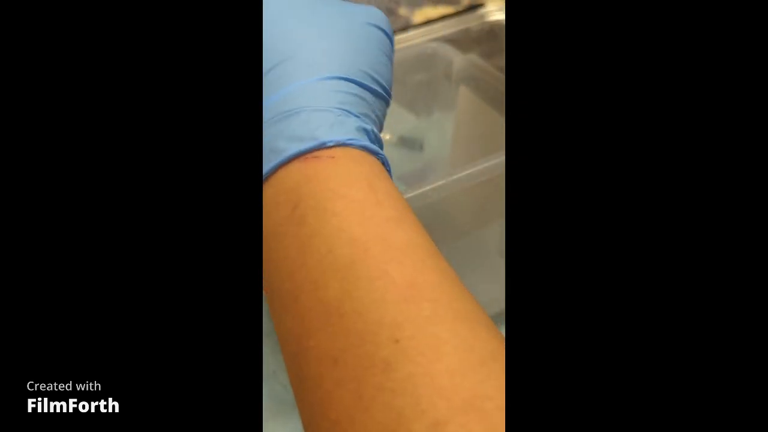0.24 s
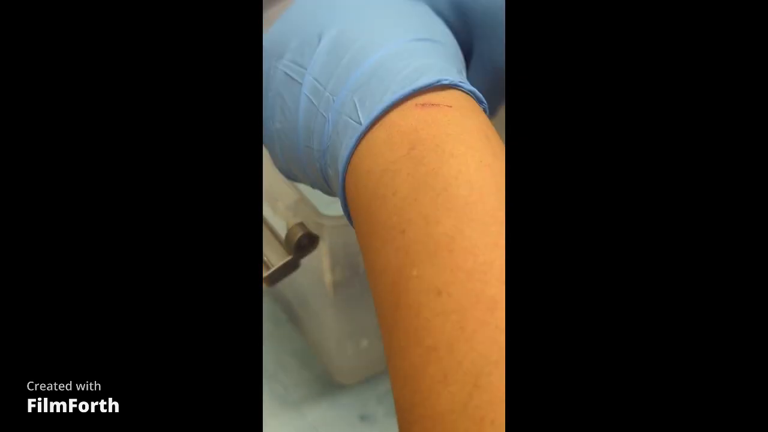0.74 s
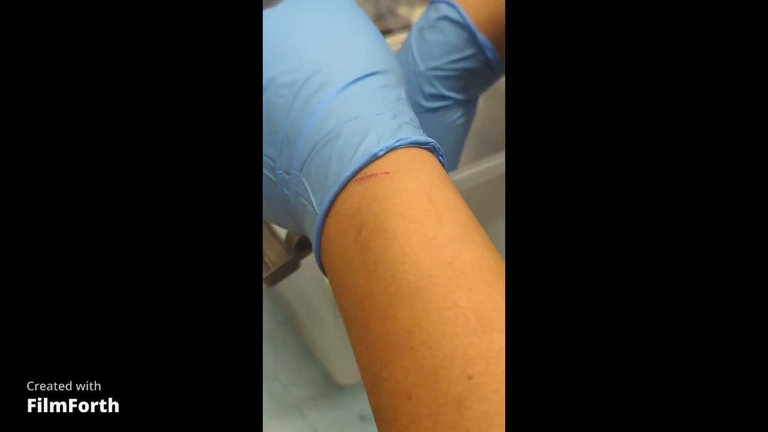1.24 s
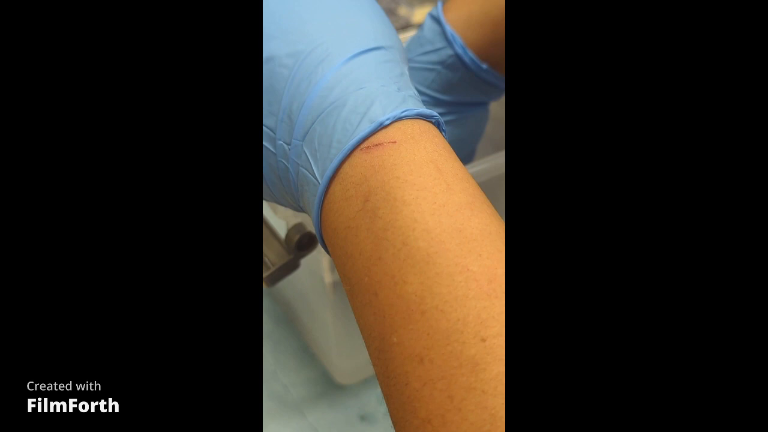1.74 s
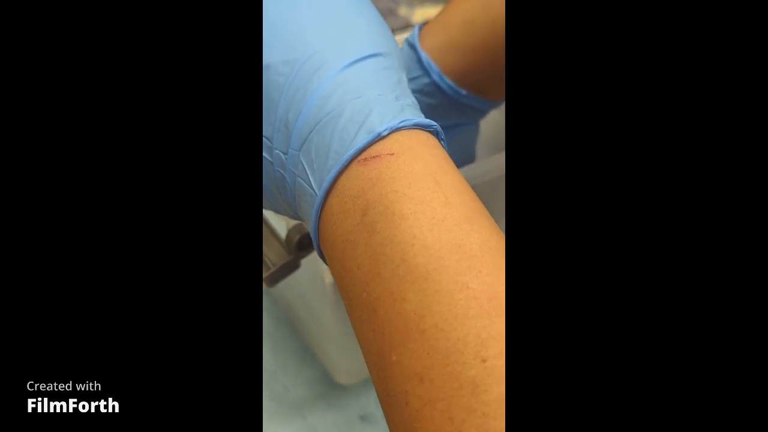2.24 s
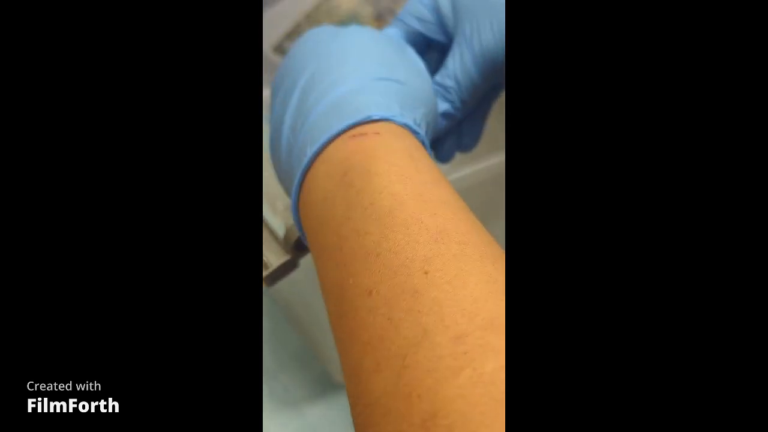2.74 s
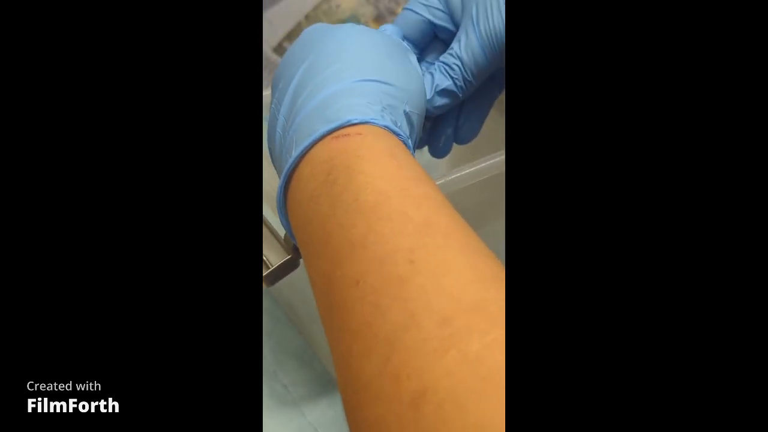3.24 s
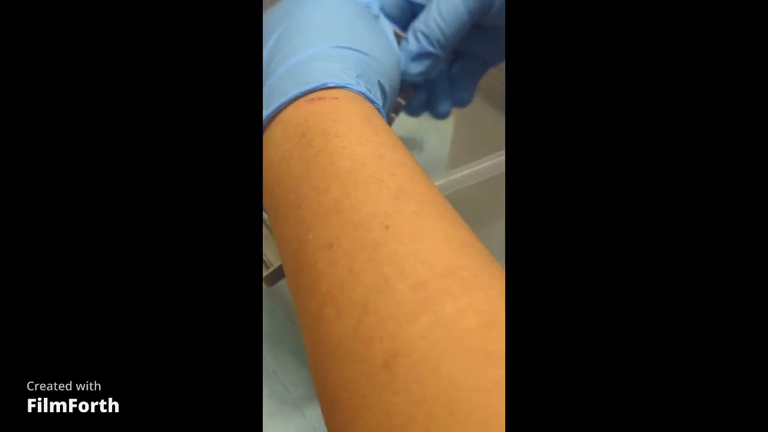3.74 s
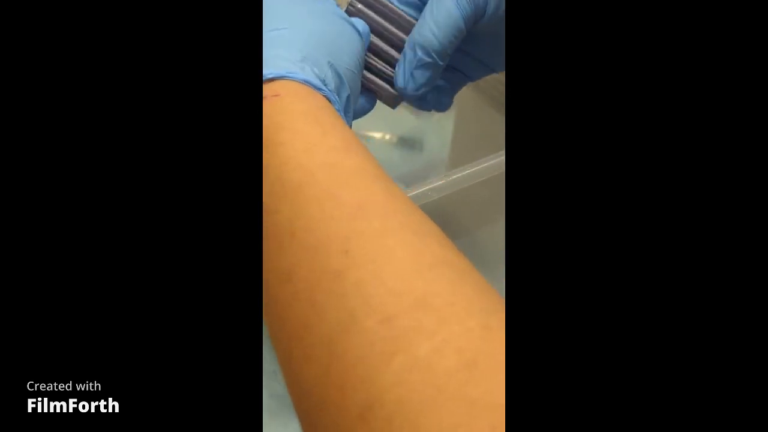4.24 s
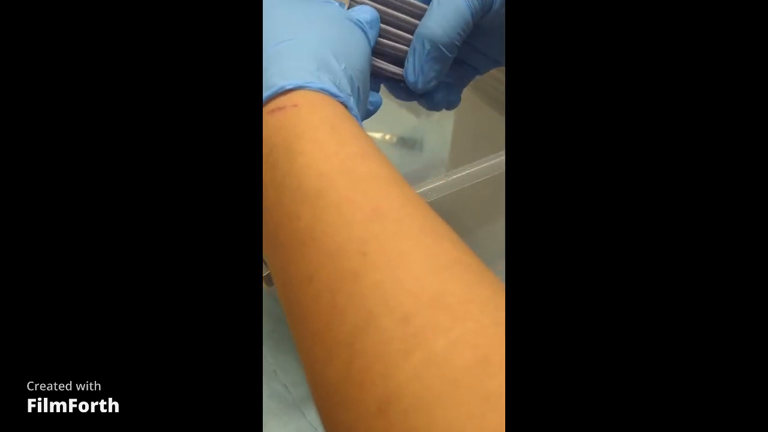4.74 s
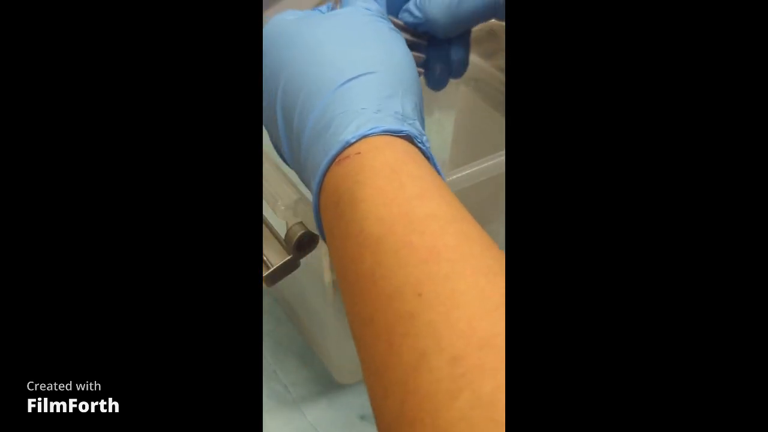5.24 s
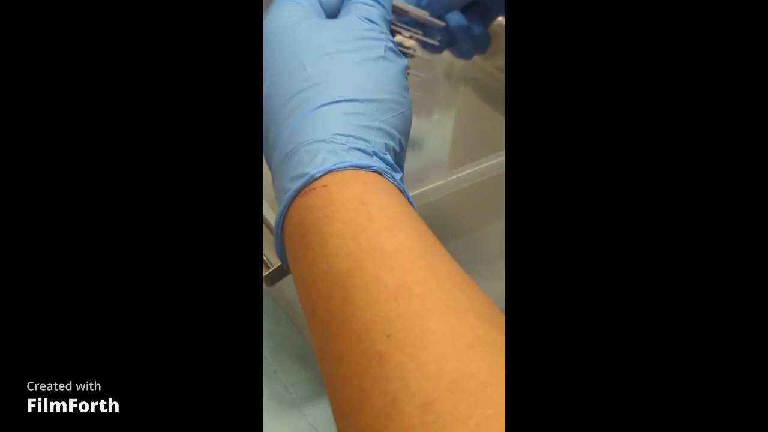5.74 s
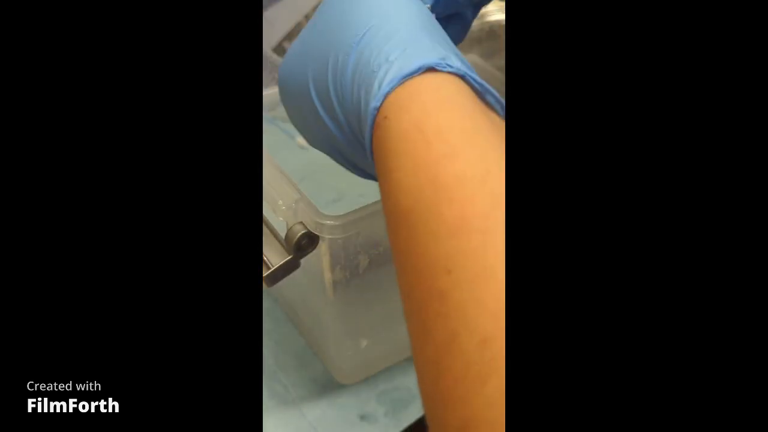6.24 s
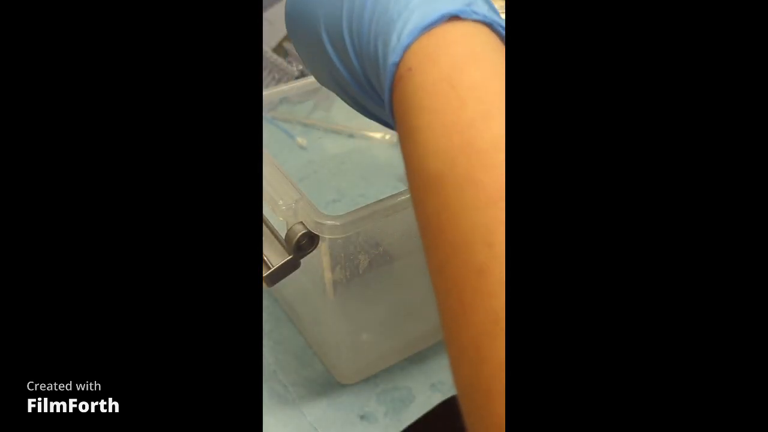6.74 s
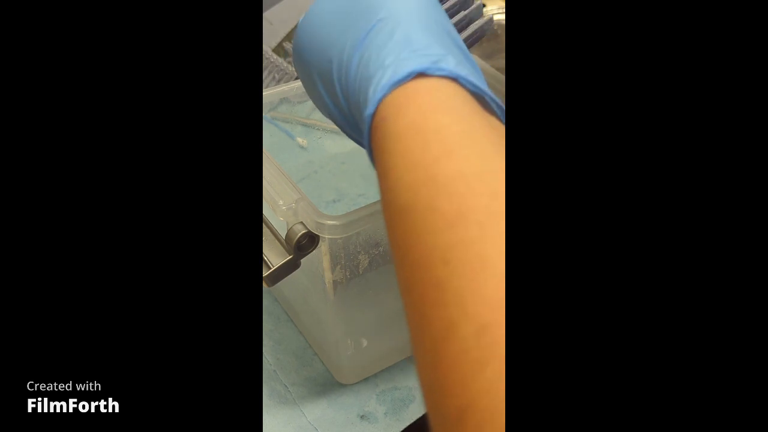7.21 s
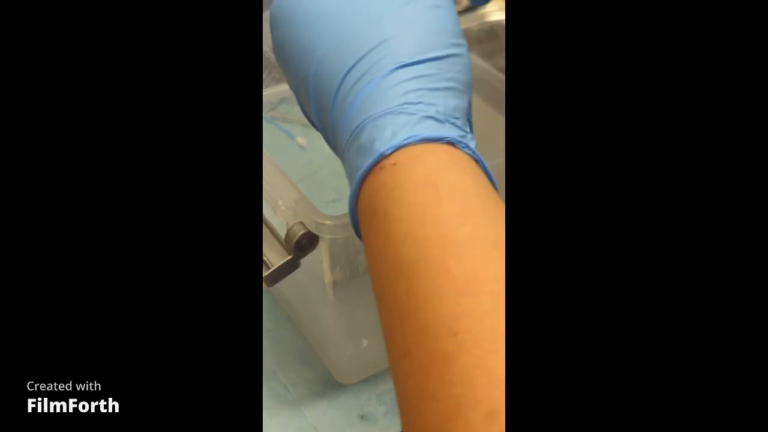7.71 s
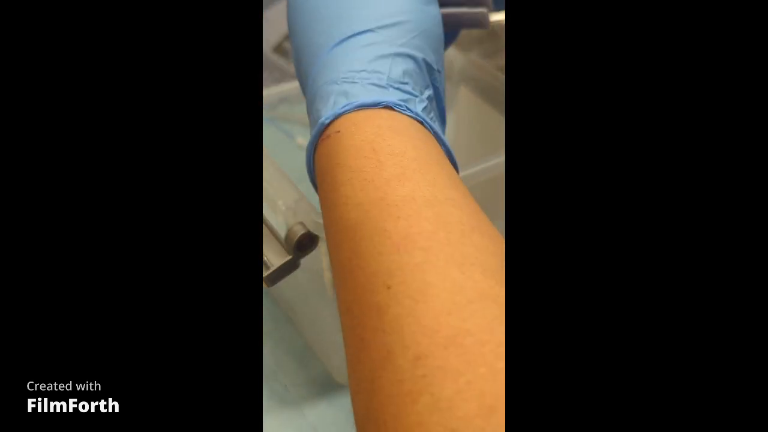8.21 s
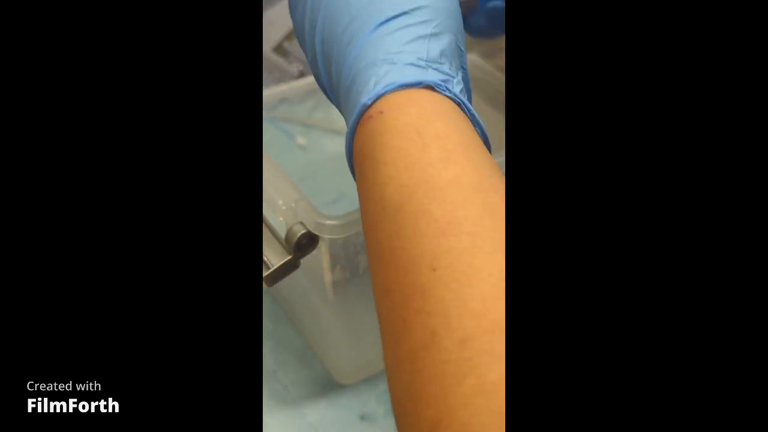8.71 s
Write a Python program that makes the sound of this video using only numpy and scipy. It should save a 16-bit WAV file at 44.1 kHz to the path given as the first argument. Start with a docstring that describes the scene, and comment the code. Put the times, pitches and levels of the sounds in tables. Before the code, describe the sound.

Very close stereo pickup in a quiet, dry indoor workspace. Gloved hands break thin brittle supports off a resin part: crisp clicks with tiny splintering crackle. A few snaps and hollow knocks on a plastic tub come first, then a dense run of bright cracks, a few isolated hard snaps, and finally a strong double tub knock. Faint glove rustle and soft bench thumps sit over a low ventilation hum with a wavering drone.

```python
"""Resin supports snapped off by hand

Gloved hands break thin resin supports off a printed part over a plastic tub, close to a two-port microphone.
Each break is a noise click and shower inside a short crackle of noise grains, both coloured by resin modes.
Decaying sines make the knocks on the tub and the bench thumps; wavering near-sines make the glove squeaks.
Behind lie a clumpy noise rustle, a faint room tail, a resonant noise hum and a wavering low drone."""
import sys
import numpy as np
from scipy import signal
from scipy.fft import rfft, irfft
from scipy.io import wavfile
from scipy.ndimage import uniform_filter1d

SR = 44100
rng = np.random.default_rng(int(sys.argv[2]) if len(sys.argv) > 2 else 0)


def generate_wav(signal):
    """Clip the signal to [-1, 1] and save it as 16-bit WAV at the path in sys.argv[1]."""
    frames = np.transpose(np.atleast_2d(signal))
    scaled = np.clip(frames, -1, 1) * 32767
    pcm = np.round(scaled).astype(np.int16)
    wavfile.write(sys.argv[1], SR, pcm)


def volts_from_decibels(level):
    """Turn decibel levels (scalar or array-like) into linear amplitude factors."""
    exponent = np.asarray(level, float) / 20
    return 10 ** exponent


N = 395577


def evened(x):
    """Scales to rms 1."""
    return x / np.sqrt(np.mean(x ** 2) + 1e-20)


def smooth_noise(count, size):
    """Noise under a moving average of size samples, at rms 1."""
    return evened(uniform_filter1d(rng.standard_normal(count), size=size))


def near(hz, centre_hz, octaves):
    """1 at the centre, falling off over some octaves."""
    return np.exp(-(np.log2(hz / centre_hz) / octaves) ** 2)


def read(points, hz):
    """Reads a spectrum table on a log-frequency axis."""
    f, value = np.transpose(points)
    return np.interp(np.log(hz + 1), np.log(f + 1), value)


def humps_db(modes, hz):
    """Resonance humps above a spectrum."""
    return sum(db / (1 + (2 * (hz - f) / width) ** 2) for f, width, db in modes)


def add(mix, s, sound):
    """Mixes a sound in at time s, cut at the end of the mix."""
    part = mix[..., round(s * SR):][..., :sound.shape[-1]]
    part += sound[..., :part.shape[-1]]


RIGHT_LAG_S, LEFT_GAIN_DB = 0.00021, 0.54


def ports(a, b, hz, likeness):
    """Two port spectra: a shared share that reaches the right port late, and an unshared one."""
    same = np.clip(likeness, 0, 1)
    right = same * a + np.sqrt(1 - same ** 2) * b
    right = right * np.exp(-2j * np.pi * hz * RIGHT_LAG_S)
    return np.array([a * volts_from_decibels(LEFT_GAIN_DB), right])


# relative snap spectrum: [f/Hz, density/dB per Hz]
SNAP_SPECTRUM = [(530, -43), (900, -10.5), (1150, -15), (1720, -4), (3430, -7), (4360, -1.5), (7770, -1),
                 (8980, 0), (14700, -5.5), (16000, -26.5), (16600, -58.5)]
# modes of part and lattice when ungripped: [f/Hz, width/Hz, height/dB]
PART_MODES = [(3970, 210, 9.5), (4260, 93, 13.5), (4900, 370, 7.5), (5280, 320, 14.5), (6440, 660, 11.5),
              (6800, 380, 12), (8050, 440, 8), (9100, 540, -4), (11130, 600, 5.5), (11800, 540, 10),
              (13700, 720, -13.5)]


def resin(drive, bright_db, free_hz, likeness, ring=1):
    """Colours a drive like brittle resin; the grip damps all modes but those near free_hz."""
    size = drive.shape[1]
    hz = np.fft.rfftfreq(size, 1 / SR)
    tip_db = bright_db * 0.84 * np.log2(np.clip(hz, 2500, 16000) / 7500)
    modes = [(f, width, ring * db * near(f, free_hz, 0.16)) for f, width, db in PART_MODES]
    uneven_db = 1.9 * smooth_noise(len(hz), size // 80)  # no two supports alike
    colour = volts_from_decibels(read(SNAP_SPECTRUM, hz) + uneven_db + tip_db + humps_db(modes, hz))
    colour /= np.sqrt(np.sum(colour[hz > 3500] ** 2) / len(hz))
    # minimum phase: rings only after the blow
    log_gain = np.log(np.r_[colour, colour[-2:0:-1]])
    colour = colour * np.exp(-1j * signal.hilbert(log_gain).imag[:len(hz)])
    return irfft(ports(*rfft(drive), hz, likeness) * colour, size)


# one support parting: [t/s of crack, crack level/dB, crackle length after crack/s,
# treble tilt/(0.84 dB per octave), freely ringing f/Hz]
SUPPORT_BREAKS = [(0.057, -35.5, 0.022, -3, 5240), (0.1432, -42, .005, -11, 4900),
                  (0.1589, -43, .012, -2, 11800), (0.3925, -52, .008, -16, 4940),
                  (1.3038, -50.5, 0.03, -25, 4300), (1.648, -40.5, 0.019, -15, 4530),
                  (1.7302, -55.5, 0.012, -16, 4120), (2.0471, -51, 0.024, -30, 3310),
                  (3.0356, -32.5, 0.016, -3, 6800), (3.1617, -31, 0.022, -2, 6400),
                  (3.2253, -41, 0.023, -6.5, 8070), (3.2762, -43, 0.0069, 2, 7140),
                  (3.324, -51.5, 0.019, -10, 6250), (3.4298, -45.5, .008, -11, 6140),
                  (3.5539, -42.5, 0.023, -5, 6700), (3.5666, -50, .006, 4, 9090),
                  (3.6805, -42.5, 0.019, -4, 9300), (3.8571, -39, 0.0074, -4, 4300),
                  (4.215, -46, 0.014, -7, 5200), (4.2584, -46.5, 0.012, -8, 4920),
                  (4.4277, -36, 0.008, -2, 6700), (4.5358, -39, 0.0087, 0, 5370),
                  (4.5635, -53, .01, -10, 5220), (4.5806, -52, .01, -10, 6440),
                  (4.6536, -49, .01, -9, 6760), (4.707, -48, 0.024, -5, 9360),
                  (4.7784, -43, .008, -4, 8260), (4.823, -53, .015, -3, 4950),
                  (4.842, -58, .014, -10, 4550), (5.1184, -54, 0.021, -12, 5350),
                  (5.2777, -31.5, 0.016, -6, 5350), (5.4246, -57, 0.017, -17, 4290),
                  (5.4725, -24, 0.012, -0.5, 10100), (5.7117, -57.5, .008, -14, 4260),
                  (6.4494, -37.5, 0.0068, -10, 4300), (6.4591, -27, 0.021, -6.5, 4230),
                  (7.3686, -60, .008, -16, 4310), (7.6062, -46.5, 0.012, -14, 4280),
                  (7.616, -44, .016, -11, 4260), (7.9366, -56, 0.016, -10, 5000),
                  (8.3141, -42, 0.015, -1.5, 4250), (8.8004, -59, .01, -21, 4010)]
SPLINTER_DB, SPLINTER_T60_S = -8.5, 0.021


def cracks():
    """A click of a few samples, then a fast-dying shower of splinters and near echoes."""
    out = np.zeros((2, N))
    t = np.arange(2048) / SR - .01
    after = t >= 0
    for s, db, _, bright_db, free_hz in SUPPORT_BREAKS:
        noise = rng.standard_normal((2, len(t)))
        click = noise * np.exp(-(t / 0.000085) ** 2)
        click /= np.linalg.norm(click, axis=1, keepdims=True)
        shower = noise * after * volts_from_decibels(SPLINTER_DB - 60 * t * after / SPLINTER_T60_S)
        add(out, s - .01, volts_from_decibels(db) * resin(3.4 * click + shower, bright_db, free_hz, 0.38))
    return out


# lattice torn, jolted or rubbed with no single crack: [t/s, length/s, start level/dB,
# level change to end/dB, treble tilt/(0.84 dB per octave), freely ringing f/Hz]
LATTICE_RUBS = [(.044, .014, -56, 2, -3, 7840), (.143, 0.028, -43, -20, -3.5, 4900),
                (.364, 0.04, -44.5, -19, -17.5, 4620), (1.33, 0.015, -72.5, -2, -12, 4100),
                (2.231, .022, -73.5, -2, -15, 7500), (2.828, 0.031, -66.5, -14, -0.5, 7300),
                (3.086, .033, -57.5, -7.5, -4, 6380), (3.427, .014, -57.5, -3, 0, 6440),
                (3.572, 0.028, -74, -5, -7, 9090), (3.627, 0.032, -74, -2, -8, 9090),
                (3.682, 0.044, -60, -16, -3, 9300), (3.753, 0.032, -71, -5, -6, 4340),
                (3.802, .021, -74, 0, -15, 5310), (3.853, 0.032, -43.5, -11, -6, 8050),
                (3.888, 0.067, -74.5, 3, -10, 7300), (4.014, 0.039, -68.5, -6, -6, 5360),
                (4.063, .07, -75.5, -5, -13, 7300), (4.206, 0.046, -58, -5, -7, 5070),
                (4.334, 0.032, -67.5, -6, -4, 5260), (4.406, 0.021, -47, -14, -2, 6800),
                (4.54, 0.066, -63, -9, -6, 5830), (4.683, .022, -72.5, 0, -8, 6550),
                (4.764, 0.017, -54.5, -7, -1, 6800), (4.825, .035, -69, -5, -8, 6910),
                (5.279, .045, -56, -17, -7, 4260), (5.453, 0.02, -48.5, -1, -3, 5270),
                (6.23, .02, -76.5, 0, -14, 5280), (6.284, .028, -81, 1, -6, 5280),
                (6.445, .017, -48, -7.5, -8, 11860), (7.053, 0.028, -34, -23, 9, 11800),
                (7.054, .03, -42, -16, -9, 4260), (7.347, .008, -70, 0, -13, 4500),
                (7.661, 0.039, -57, -6.5, -13.5, 4050), (8.595, 0.028, -46, -22.5, -24, 4900),
                (8.627, .018, -60, -28, -38, 3800)]
LEAD_S, LEAD_DB = .009, -23  # short rise into the crack: duration, start re top
UNDER_DB, DYING_DB = -12.5, -15.5  # top re crack level; end re top
RING_SHARE = 0.81  # grains excite the modes less than a crack does


def crackles():
    """Dense uneven grains around each crack and in each rub, with a short fade at the end."""
    out = np.zeros((2, N))
    t = np.arange(4096) / SR - .01
    shapes = []
    for s, db, length, bright_db, free_hz in SUPPORT_BREAKS:
        times = [0, LEAD_S, LEAD_S + length]
        dbs = db + UNDER_DB + np.array([LEAD_DB, 0, DYING_DB])
        shapes.append((s - LEAD_S, times, dbs, bright_db, free_hz))
    for s, length, db, fall_db, bright_db, free_hz in LATTICE_RUBS:
        shapes.append((s, [0, length], [db, db + fall_db], bright_db, free_hz))
    for s, times, dbs, bright_db, free_hz in shapes:
        noise = rng.standard_normal((2, len(t)))
        lumps = volts_from_decibels(3.2 * smooth_noise(len(t), 30))
        edges = np.clip(t / 0.0043 + 0.67, 0, 1) * np.clip((times[-1] - t) / 0.0025 + 0.59, 0, 1)
        level = volts_from_decibels(np.interp(t, times, dbs)) * edges
        add(out, s - .01, resin(noise * lumps * level, bright_db, free_hz, 0.14, RING_SHARE))
    return out


# blows on the tub, each begun 2 ms before t: [t/s, level/dB, upper modes/dB,
# upper region favoured by the spot f/Hz, contact/s as onset time constant at 540 Hz]
TUB_KNOCKS = [(0.367, -25, -10, 1370, 0.004), (0.378, -33.5, -13, 1400, 0.0018),
              (1.2, -33.5, -7, 1140, 0.0047), (1.211, -43, -31, 923, .003),
              (1.296, -30.5, -4.5, 1030, 0.0026), (1.309, -31.5, -13, 1890, 0.0019),
              (1.367, -27, -20, 1050, .01), (1.406, -38, -10.5, 1330, 0.0056),
              (1.641, -36, -6.5, 1740, .002), (1.723, -43, -16, 1320, 0.0041), (1.885, -45, -4, 1210, .003),
              (1.966, -37.5, -14, 1190, 0.0046), (2.034, -40, -14, 918, .004),
              (2.049, -25, -3, 1180, 0.0042), (2.074, -37.5, -6.5, 1250, 0.0026),
              (2.215, -39.5, -11, 1000, 0.0027), (2.447, -29.5, -15, 1200, 0.0058),
              (3.392, -41.5, -15, 1350, 0.0028), (8.597, -17, -9.5, 1440, 0.0088),
              (8.628, -22.5, -7, 1500, 0.0056)]
# tub modes: [f/Hz, level/dB, t60/s before DAMPING]
TUB_MODES = [(545, 6.5, 0.049), (615, 2.5, 0.041), (677, 4, 0.022), (1030, 2.5, 0.027), (1180, 2, 0.027),
             (1350, -1.5, 0.043), (1520, -5.5, 0.032), (1783, -7.5, 0.034), (1993, -2, 0.019),
             (2280, -17, .02), (2610, -32, .025), (3320, -8.5, 0.018)]
DAMPING = 1.16  # divides t60
TUB_LAG_S = .00012  # right port after left


def knocks():
    """Each blow rings the tub's modes in a mix set by the spot; a longer contact gives a softer start."""
    out = np.zeros(N)
    t = np.arange(5000) / SR
    hz, mode_db, t60 = np.transpose(TUB_MODES)[:, :, None]
    for s, db, upper_db, spot_hz, contact in TUB_KNOCKS:
        uneven, detune, phase = rng.standard_normal((3, len(TUB_MODES), 1))
        spot_db = (hz > 900) * (upper_db + 7 * near(hz, spot_hz, 0.12))
        level_db = mode_db + spot_db + 1.0 * uneven
        swing = np.sin(2 * np.pi * hz * (1 + 0.0081 * detune) * t + 0.43 * phase)
        start = 1 - np.exp(-t * hz / 540 / max(contact, .0003))  # high modes start sooner
        modes = volts_from_decibels(level_db - 60 * t * DAMPING / t60) * swing * start
        add(out, s - .002, volts_from_decibels(db) * modes.sum(0))
    return np.array([out, np.roll(out, round(TUB_LAG_S * SR))])


# bench pushed: [t/s, level/dB, f/Hz]
BENCH_THUMPS = [(0.554, -34.5, 74), (1.297, -28, 77), (2.85, -40, 77), (3.715, -39, 61), (3.819, -40, 93),
                (5.567, -37, 52.5), (5.677, -38, 65.5)]
THUMP_SWINGS = 16.6  # swings until 60 dB down
OVERTONE_RATIO, OVERTONE_DB = 1.7, -6.5


def thumps():
    """The bench takes a push: a low damped swing and a second one above it, with a soft start."""
    out = np.zeros(N)
    t = np.arange(SR // 2) / SR
    for s, db, hz in BENCH_THUMPS:
        envelope = volts_from_decibels(db - 60 * t * hz / THUMP_SWINGS) * (1 - np.exp(-t / 0.0024))
        swing = np.sin(2 * np.pi * hz * t)
        overtone = volts_from_decibels(OVERTONE_DB) * np.sin(2 * np.pi * OVERTONE_RATIO * hz * t)
        add(out, s, envelope * (swing + overtone))
    return out


# glove on resin: [t/s, length/s, level/dB, f/Hz]
GLOVE_SQUEAKS = [(2.234, .022, -64.5, 4980), (2.325, 0.021, -68, 2770), (2.655, .028, -66, 2870)]


def squeaks():
    """Faint glove squeaks: a wavering near-sine under one soft arch, weaker at the right port."""
    out = np.zeros(N)
    for s, length, db, hz in GLOVE_SQUEAKS:
        t = np.arange(0, length, 1 / SR)
        waver = smooth_noise(2048, 150)[:len(t)]
        turns = np.cumsum(hz * (1 + .012 * waver)) / SR
        arch = np.sqrt(2 * np.sin(np.pi * t / length))
        add(out, s, volts_from_decibels(db) * arch * np.sin(2 * np.pi * turns))
    return out * np.array([[1], [.6]])


# glove rustle before clumping: [t/s, level/dB]
RUSTLE_LEVEL = [(0, -91), (.6, -94), (1, -106), (2.4, -102), (2.7, -90), (3.1, -92), (4, -87), (4.9, -92),
                (5.4, -92), (5.7, -104), (6.3, -95), (6.7, -106), (7.5, -98), (8, -100), (8.97, -104)]


def rustle():
    """Faint glove rustle: bright noise in uneven clumps, stronger while the hands work."""
    t = np.arange(N) / SR
    clumps_db = 4.5 * smooth_noise(N, 900)
    band = signal.butter(2, [3500, 11000], "bandpass", fs=SR, output="sos")
    grains = evened(signal.sosfilt(band, rng.standard_normal((2, N))))
    return grains * volts_from_decibels(np.interp(t, *np.transpose(RUSTLE_LEVEL)) + clumps_db)


def room(x):
    """A short tail of sparse decaying taps, other ones for each port."""
    t = np.arange(SR // 4) / SR
    sparse = rng.random((2, len(t))) < .05
    taps = rng.standard_normal((2, len(t))) * sparse * (t > .004) * volts_from_decibels(-60 * t / .25)
    return signal.fftconvolve(x, taps / np.linalg.norm(taps[0]), axes=1)[:, :N]


# relative hum spectrum: [f/Hz, density/dB per Hz]
HUM_SPECTRUM = [(15, -48.5), (28, -14), (55, -2.5), (130, -11.5), (300, -8.5), (340, -14), (660, -22),
                (890, -24.5), (1840, -21), (2400, -29.5), (3500, -39), (5350, -46), (5880, -54.5),
                (14500, -65.5), (16200, -77)]
# duct resonances: [f/Hz, width/Hz, height/dB]
DUCT_MODES = [(188, 25.6, 10.5), (292.1, 40, 8), (762.5, 145, 14), (1379, 78, 7), (1787, 5, 9.5),
              (2462, 38, 10), (4250, 48, 11)]
# left-right likeness of the hum: [f/Hz, likeness/0..1]
HUM_LIKENESS = [(60, 0.9), (300, 0.99), (700, 0.9), (1200, 0.24), (2500, 0.1), (6000, 0.0796)]
HUM_RMS_DB = -48


def hum():
    """Ventilation air noise through duct resonances, with drifting patches."""
    frames = N // 512 + 5
    hz = np.fft.rfftfreq(2048, 1 / SR)[:, None]
    a, b, c, d, patches = rng.standard_normal((frames, 1025, 5)).T
    patches = uniform_filter1d(patches, size=20, axis=0)
    patches = evened(uniform_filter1d(patches, size=8, axis=1))
    z = ports(a + 1j * b, c + 1j * d, hz, read(HUM_LIKENESS, hz))
    z *= volts_from_decibels(read(HUM_SPECTRUM, hz) + humps_db(DUCT_MODES, hz) + 0.73 * patches)
    noise = signal.istft(z, nperseg=2048, noverlap=1536)[1][:, :N]
    return volts_from_decibels(HUM_RMS_DB) * evened(noise)


# far low drone before its throb: [t/s, level/dB]
DRONE_LEVEL = [(0, -57.5), (.9, -52.5), (1.5, -59), (1.9, -52), (2.5, -60), (5.5, -57.5), (6.2, -55.5),
               (7.5, -54.5), (7.9, -48.5), (8.97, -50)]
DRONE_HZ = 53.96  # mean


def drone():
    """A far low tone that swells and wavers in pitch and strength."""
    t = np.arange(N) / SR
    waver = smooth_noise(N, 2500)
    throb_db = 1.6 * smooth_noise(N, 2500)
    turns = np.cumsum(DRONE_HZ * (1 + 0.1554 * waver)) / SR
    level = volts_from_decibels(np.interp(t, *np.transpose(DRONE_LEVEL)) + throb_db)
    return level * np.sqrt(2) * np.sin(2 * np.pi * turns)


def scene():
    """Hands, tub and bench in the humming room."""
    hands = cracks() + crackles() + knocks() + squeaks()
    return hands + volts_from_decibels(-48.0) * room(hands) + thumps() + rustle() + hum() + drone()


def top_cut(x):
    """Nothing passes above the cut-off."""
    return signal.sosfilt(signal.butter(12, 16520, fs=SR, output="sos"), x)


def record(dry):
    """Takes the finished mix to the output."""
    return top_cut(dry)


dry = scene()
out = record(dry)
generate_wav(out)
```